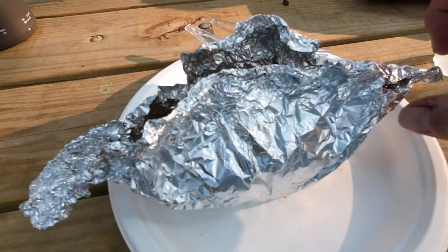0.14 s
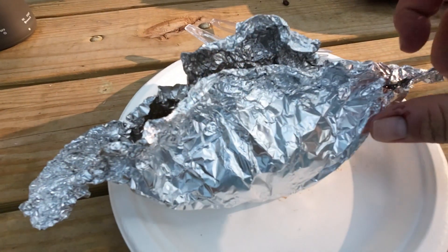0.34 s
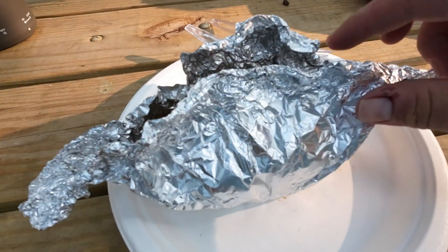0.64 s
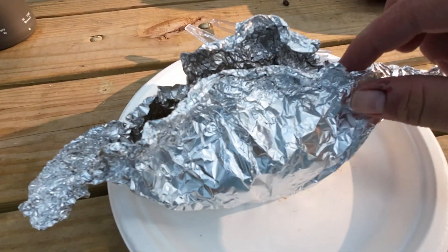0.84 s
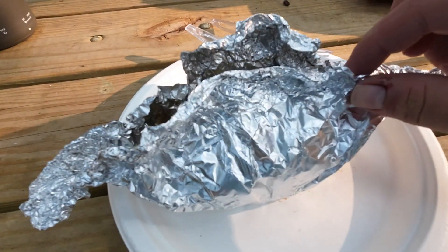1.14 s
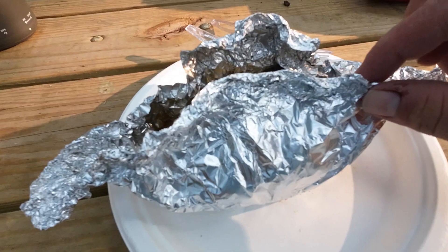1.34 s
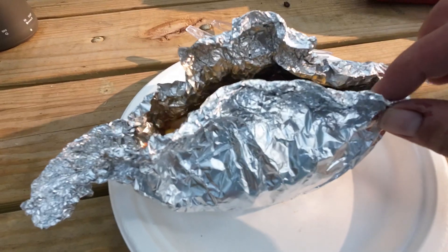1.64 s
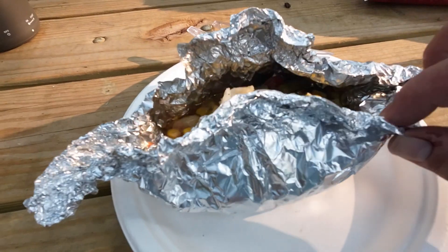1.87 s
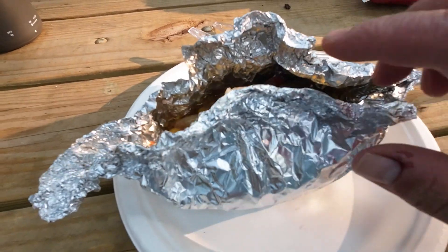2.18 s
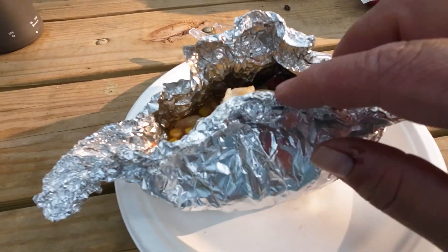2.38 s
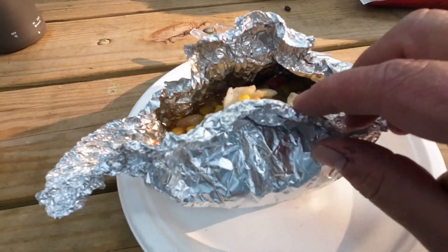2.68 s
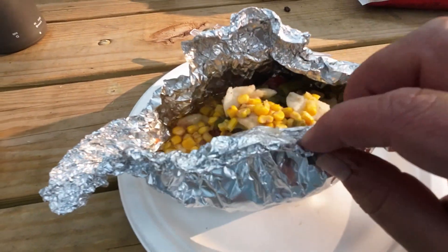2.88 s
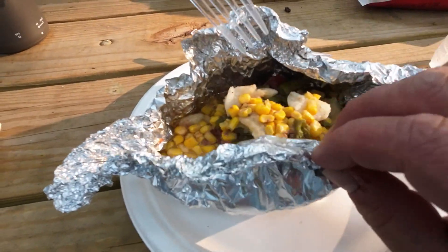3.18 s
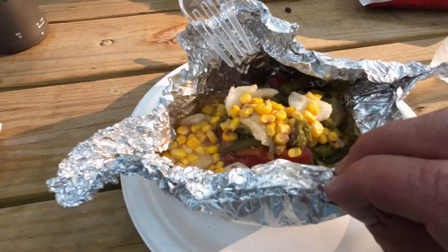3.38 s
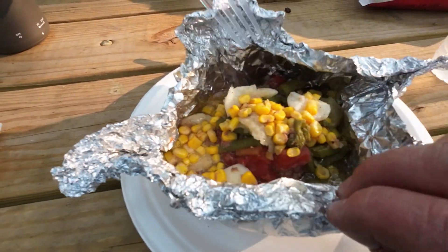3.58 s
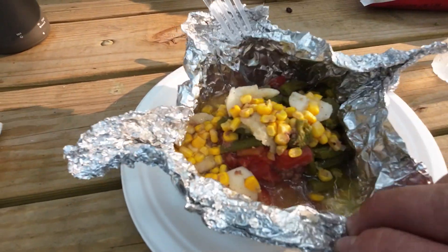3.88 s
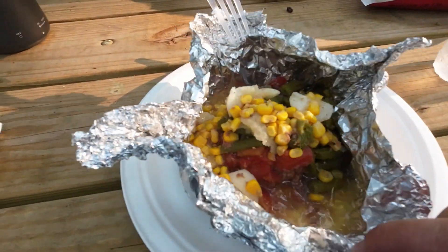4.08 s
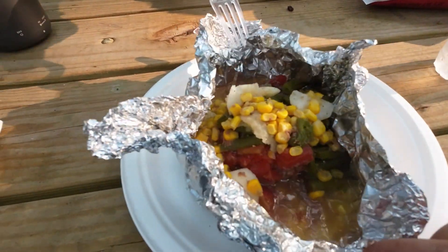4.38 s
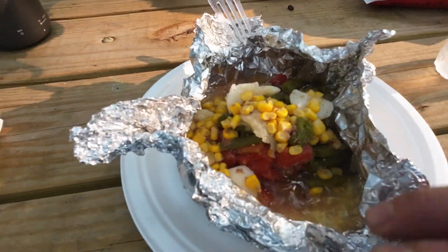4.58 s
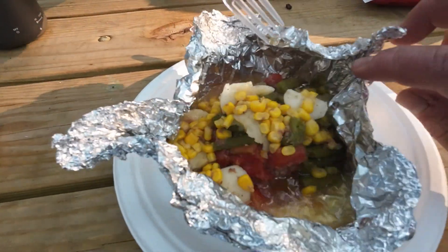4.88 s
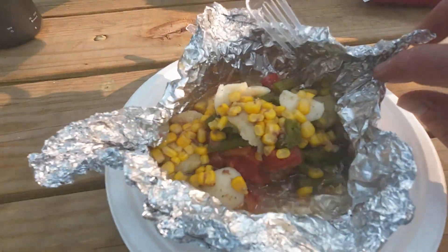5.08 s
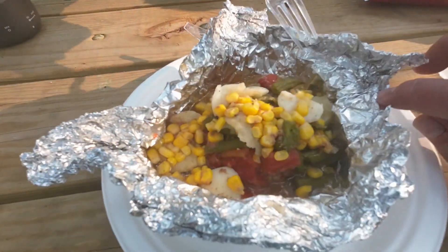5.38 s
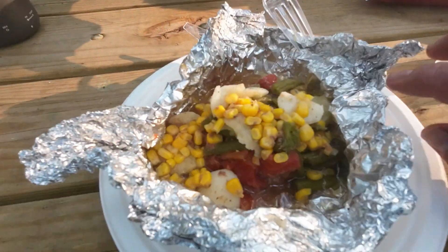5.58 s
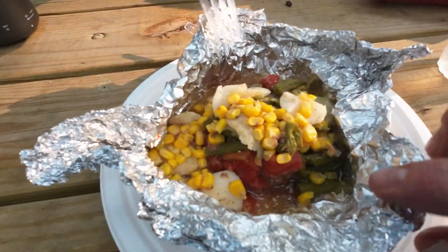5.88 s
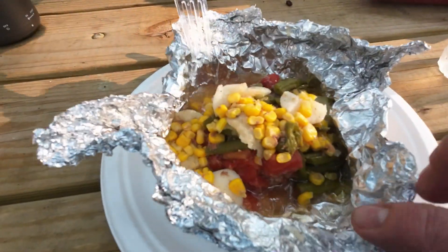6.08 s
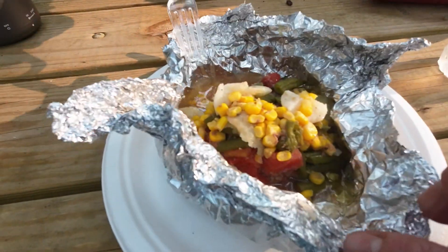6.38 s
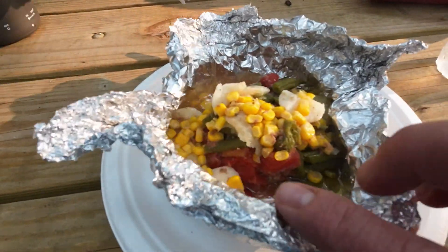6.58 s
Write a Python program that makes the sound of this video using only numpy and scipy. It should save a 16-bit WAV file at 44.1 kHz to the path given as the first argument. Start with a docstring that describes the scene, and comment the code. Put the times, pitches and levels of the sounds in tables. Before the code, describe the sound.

Over a steady low outdoor hum, aluminium foil is touched lightly, then pulled open in short, jerky bursts of crackling and sharp, tinny clicks. Fingertips rub the sheet, and the parcel of food now and then bumps softly on its plate. The foil is close and a little to the right, while a barely audible bird whistles far off to the left. Everything has a slightly hollow tone.

```python
"""Aluminium foil crinkles as fingers peel open a parcel of cooked vegetables on a plate.
Its creases buckle and ring in small metallic clinks, while skin rubs, wrinkles crackle and pushes thud.
The plate stands on a wooden table outdoors, where a low hum goes on and a bird whistles faintly.
Everything below the top octave arrives twice, a few milliseconds apart: a comb filter that sounds hollow."""
import sys
import numpy as np
from scipy import signal
from scipy.fft import rfft, irfft, next_fast_len
from scipy.io import wavfile
from scipy.ndimage import uniform_filter1d, map_coordinates

SR = 44100
rng = np.random.default_rng(int(sys.argv[2]) if len(sys.argv) > 2 else 0)


def master(y):
    """Save y as 16-bit WAV."""
    cut = np.clip(np.atleast_2d(y).T, -1, 1)
    pcm = np.round(cut * 32767)  # scale
    wavfile.write(sys.argv[1], SR, pcm.astype(np.int16))


N = 296793

# Levels are relative within each table.
# Spectra of open air, rubbing skin, coarse wrinkles and fine wrinkles: (frequency [Hz], level [dB])
AIR_SPECTRUM = [(12, -12), (32, 0.5), (56, 1), (92, -8), (145, -5.5), (275, -11), (460, -22.5),
                (820, -24.5), (1550, -34.5), (2450, -36.5), (4300, -46), (5650, -42.5), (7100, -55),
                (9100, -51.5), (11600, -54), (15200, -56.5)]
RUB_SPECTRUM = [(60, 0.5), (200, 1), (500, -8), (1000, -6), (1600, -7), (2600, -22.5), (6000, -62.5)]
CRINKLE_SPECTRUM = [(600, -22), (1500, 3), (2400, 11.5), (4000, 4.5), (6000, 5.5), (9000, -22.5),
                    (12000, 2.5)]
FIZZ_SPECTRUM = [(4000, -34), (8000, 7), (10500, 6), (16000, -1.5)]
# Stereo width of the air and of the foil: (frequency [Hz], side gain [dB])
AIR_SIDE_GAIN = [(35, -11), (70, -9), (130, -27.5), (500, -15), (2000, -7), (5000, -2.5), (10000, 2.5)]
FOIL_SIDE_GAIN = [(300, -22.5), (1500, -19.5), (2400, -17), (3700, -9.5), (4400, -11), (5300, -6.5),
                  (8000, -6), (11000, -2), (15000, -1.5)]
# Swells of the drone: (peak time [s], level [dB], rise constant [s], fall constant [s])
DRONE_SWELLS = [(2.4, -50.5, 0.054, .25), (4.88, -48, 0.14, 0.17), (5.15, -51, 0.068, 0.078),
                (5.56, -57, 0.064, 0.055)]
# High arching whistles: (time [s], level [dB])
BIRD_ARCHES = [(.15, -87), (1.87, -86)]
# Lower sagging notes: (time [s], duration [s], pitch [Hz], sag [Hz], level [dB])
BIRD_NOTES = [(.18, .27, 4035, 48, -79), (.54, .16, 2330, 370, -79), (1.935, 0.092, 4050, 80, -71),
              (5.72, .18, 4000, 10, -83)]
# The parcel bumps the plate: (time [s], level [dB])
PLATE_BUMPS = [(2.064, -38), (2.099, -42), (2.564, -40.5), (2.611, -35), (3.572, -44), (4.21, -40.5),
               (4.267, -42), (4.368, -41.5), (4.837, -35.5), (6.056, -37), (6.078, -46), (6.236, -35.5),
               (6.388, -45)]
# Crinkling of the held sheet between pulls: (time [s], level [dB])
GRIP_LEVELS = [(0, -100), (1.8, -94), (2.02, -68), (2.25, -95), (2.55, -66), (2.95, -73.5), (3.25, -75.5),
               (3.65, -74), (3.9, -67), (4.4, -72.5), (4.62, -68.5), (4.76, -88), (5.2, -71), (5.72, -75),
               (5.83, -95), (6.1, -70.5), (6.33, -84), (6.45, -60), (6.73, -70)]
# Pulls on the sheet: (time [s], duration [s], crinkle [dB], rub re crinkle [dB], fizz re crinkle [dB])
FINGER_PULLS = [(1.04, 0.13, -72.5, -5, -1.5), (2.015, 0.046, -58, -12, -7.5),
                (2.123, 0.012, -53.5, -3.5, -9), (2.364, 0.026, -66.5, -2, -9), (2.414, 0.031, -57, -7, -8),
                (2.553, 0.072, -57.5, -7.5, -6), (2.7, .11, -63, -4.5, -3.5),
                (2.832, 0.072, -60.5, -10, -10), (2.988, .14, -60.5, -11, -11),
                (3.378, 0.097, -65.5, 3.5, -5.5), (3.569, 0.029, -51.5, 0, -27),
                (3.719, 0.096, -64.5, 4.5, -12), (3.92, 0.048, -50.5, -10, -13),
                (4.053, 0.028, -58.5, 1.5, -13), (4.185, 0.11, -62.5, 1.5, -17),
                (4.455, 0.068, -63.5, -3, -12), (4.55, 0.083, -60, 2.5, -11),
                (4.834, 0.019, -65, -1.5, -10), (5.12, 0.657, -79.5, 0, 1.5), (5.26, 0.059, -62, 4, -21),
                (5.34, 0.11, -69, 3, -10), (5.52, .14, -68, -0.5, -4), (5.671, 0.032, -59, 5, -7.5),
                (5.886, 0.051, -51.5, -6.5, -6), (5.945, 0.14, -54, -2.5, -11), (6.119, .085, -54, -1, -11),
                (6.211, 0.021, -48.5, -4.5, -8.5), (6.448, 0.083, -57, 0, -11.5),
                (6.534, 0.067, -55, -10, -3)]
# Buckling creases: (time [s], level [dB], facet pitch [Hz], knock [dB], sizzle [dB], facet t60 [s])
CREASE_SNAPS = [(0.883, -47.5, 5190, -2, -18, .016), (.908, -57, 5000, -15, 1, 0.01),
                (0.936, -50, 4040, -15, -7, 0.021), (1.478, -61, 5000, -14, -5, .01),
                (1.583, -41.5, 2000, -32, -36, 0.0072), (1.713, -51, 4560, -15, -5, .014),
                (1.745, -63, 5000, -15, -4, .012), (1.936, -51.5, 4000, -20, -10, .012),
                (2.034, -38.5, 2110, -3.5, -8.5, 0.029), (2.101, -31.5, 2340, -22, -8.5, 0.0089),
                (2.343, -40.5, 4750, -8.5, -14, 0.018), (2.429, -34.5, 8700, -30, 5.5, .013),
                (2.46, -45.5, 3460, -25, 3, .01), (2.564, -22.5, 3460, -8.5, -19, .022),
                (2.569, -23, 3450, -10.5, -11, 0.024), (2.61, -25, 5620, -4.5, -20, 0.041),
                (2.613, -21.5, 5760, -12, -18, 0.011), (2.626, -32, 3530, -15, -7, .03),
                (2.702, -39, 1880, -28, -15, .016), (2.725, -24, 3960, -41, -14.5, 0.0082),
                (2.775, -25.5, 2200, -21.5, -16, 0.025), (2.864, -29.5, 3150, -12, -28, .025),
                (2.876, -37, 3200, -20, -26, 0.0074), (2.946, -27.5, 4050, -55, -42, 0.018),
                (3.025, -42.5, 2700, -18, -17, 0.011), (3.24, -40, 2135, -26.5, -17, 0.015),
                (3.338, -43, 3670, -2.5, -10, .015), (3.401, -42.5, 4980, -6, -6, 0.023),
                (3.485, -39, 1770, -12.5, -16, .022), (3.569, -27, 2340, -4, -11.5, .015),
                (3.579, -25, 5040, -3.5, -12, .019), (3.603, -26, 1680, -10, -10, .01),
                (3.856, -18.5, 2380, -28, -16, .015), (3.918, -12, 2410, -24, -19.5, .017),
                (4.126, -46, 2120, -30, 2.5, 0.011), (4.162, -36.5, 2580, -17, -12, 0.017),
                (4.193, -36, 3450, 3, -25, 0.017), (4.203, -33.5, 2530, -16, -5.5, .013),
                (4.212, -31.5, 2390, 3, -27, 0.011), (4.241, -31, 4900, -2, -23, 0.0067),
                (4.267, -21, 2305, -15, -20, 0.012), (4.283, -35.5, 4270, -5, -14, 0.0085),
                (4.367, -23, 2360, -10, -15.5, .015), (4.371, -25, 2386, -6, -20, .015),
                (4.448, -35, 2610, -27, -13, 0.023), (4.458, -35, 2660, -3.5, -12, .012),
                (4.561, -33, 3460, -23, -8, .013), (4.836, -40.5, 3365, 4.5, -12, .035),
                (4.934, -50, 3500, -20, -12, 0.0133), (4.985, -28, 5300, -2.5, -22, .016),
                (5.244, -41, 5000, 2.5, -24, 0.025), (5.269, -37, 2040, -2, -23, 0.0084),
                (5.314, -30.5, 3900, 1, -13, .021), (5.369, -34.5, 5200, -26, -15, 0.022),
                (5.463, -43.5, 2600, -22, -23, 0.013), (5.554, -43, 3100, -9, -13, 0.018),
                (5.579, -26, 3500, -26, -13, 0.016), (5.59, -18.5, 3306, -32.5, -16, .017),
                (5.625, -45, 3500, -23, -20, .012), (5.702, -30, 2410, -18, -19, 0.016),
                (5.917, -35, 2370, 0, -12, 0.015), (5.963, -36.5, 3070, -31, 0.5, 0.02),
                (5.991, -31, 2320, -3, -5, 0.022), (6.054, -32.5, 2090, 7, -12, .017),
                (6.079, -24.5, 3640, -27, -5.5, 0.0095), (6.082, -25.5, 3130, 2, -11.5, .013),
                (6.17, -35, 3400, -15, -12, .018), (6.235, -30.5, 2780, 0, -7, 0.0095),
                (6.336, -43.5, 6830, -17, -7, .013), (6.387, -28.5, 6130, -17, -15, .013),
                (6.389, -26, 5690, -3, -30, .008), (6.457, -37, 2210, -5, -20, 0.018),
                (6.578, -32, 4280, -48, -25, 0.032)]
# Responses of the early arrival, the late arrival and their sum: (frequency [Hz], gain [dB])
EARLY_RESPONSE = [(100, -1.5), (1500, 3.5), (5000, 1.5), (7700, .5), (9500, -14.5), (12000, -26.5)]
LATE_RESPONSE = [(100, 4), (1000, -3), (5000, -2.5), (9000, -2.5)]
OVERALL_RESPONSE = [(2000, -2), (2380, -0.5), (2700, -1), (7500, 3), (8900, -0.5), (10000, 5), (11700, 6.5),
                    (12900, -15), (14200, -1), (15400, 0), (15900, -24), (17500, -34.5)]

DOUBLING_S, TOP_HZ = .00378, 17500


def amp(db):
    """Amplitude ratio of a level in decibels."""
    return 10 ** (np.asarray(db) / 20)


def unit(x):
    """Normalisation to rms 1."""
    return x / np.sqrt(np.mean(x ** 2) + 1e-20)


def decay(t, t60):
    """Exponential damping: 60 dB in t60 seconds."""
    return np.exp(-np.log(1000) * t / t60)


def gain_at(points, hz):
    """Gain interpolated from (frequency [Hz], level [dB]) points on a logarithmic frequency axis."""
    knots_hz, db = np.transpose(points)
    return amp(np.interp(np.log(hz + 1), np.log(knots_hz + 1), db))


def wobble(rate):
    """Random modulation: a spline through `rate` Gaussian knots a second."""
    return map_coordinates(rng.standard_normal(int(N * rate / SR) + 4), [np.arange(N) * rate / SR])


def filtered(x, response):
    """Linear filtering: the spectrum is multiplied by a complex frequency response."""
    size = next_fast_len(N + SR // 4)
    return irfft(rfft(x, size) * response(np.fft.rfftfreq(size, 1 / SR)), size)[..., :N]


def coloured(x, spectrum):
    """Zero-phase filtering by (frequency [Hz], level [dB]) points."""
    return filtered(x, lambda hz: gain_at(spectrum, hz))


def narrowed(pair, side_gain):
    """Stereo width follows the ratio of side to mid, here set by frequency."""
    return np.array([pair[0], coloured(pair[1], side_gain)])


def narrow_noise(centre_hz, width_hz):
    """A resonance passes a narrow band of noise; mid and side, rms 1."""
    noise = rng.standard_normal((2, N))
    return unit(filtered(noise, lambda hz: 1 / (1 + ((hz - centre_hz) / width_hz) ** 2)))


def outdoors():
    """Superposed noise bands: the rumble of open air, a deep hum and a wide, swelling drone."""
    t = np.arange(N) / SR
    air = amp(-58.5 + .21 * wobble(4.5)) * unit(coloured(rng.standard_normal((2, N)), AIR_SPECTRUM))
    hum = amp(-65) * narrow_noise(centre_hz=34.1, width_hz=4)
    drone = narrow_noise(centre_hz=80.2, width_hz=7.1)
    drone += amp(-3.5) * narrow_noise(centre_hz=37, width_hz=28)
    strength = amp(-70.5 + 1.5 * t)  # slow growth beneath the swells
    for peak, db, rise, fall in DRONE_SWELLS:
        strength += amp(db) * np.exp(-np.maximum((peak - t) / rise, (t - peak) / fall))
    return narrowed(air + hum, AIR_SIDE_GAIN) + strength * drone * amp([[-2], [-4.5]])


def whistle(start, length, hz, db):
    """Random amplitude and frequency modulation make a pure tone flutter."""
    t = np.arange(N) / SR - start
    gate = np.clip(np.minimum(t, length - t) / .012, 0, 1)
    strength = gate * amp(db + 4.7 * wobble(70))
    pitch_hz = hz * (1 + .009 * wobble(300))
    return strength * np.sin(2 * np.pi * np.cumsum(pitch_hz) / SR)


def bird(arch_s=.42, foot_hz=8900, dip=.22, fade_db=17):
    """Frequency glides of a faint bird to the left: high arches, and lower notes that sag and fade."""
    song, t = np.zeros(N), np.arange(N) / SR
    for start, db in BIRD_ARCHES:
        turn = np.pi * np.clip((t - start) / arch_s, 0, 1)
        arch = np.sin(turn) * (1 + 2 * dip * np.cos(2 * turn)) / (1 - dip)  # a crown with two peaks
        song += whistle(start, arch_s, foot_hz + 2600 * arch, db - 7 * (1 - arch))
    for start, length, hz, sag_hz, db in BIRD_NOTES:
        progress = np.clip((t - start) / length, 0, 1)
        song += whistle(start, length, hz - sag_hz * progress, db - fade_db * progress)
    return np.array([song, .5 * song])


def table_echo(pair, t60, wet_db):
    """Scattering from the table and things nearby adds a short diffuse tail."""
    t = np.arange(SR // 6) / SR
    tail = rng.standard_normal((2, len(t))) * decay(t, t60) * (t > .004)
    tail /= np.linalg.norm(tail, axis=1, keepdims=True)
    return pair + amp(wet_db) * signal.fftconvolve(pair[:1], tail, axes=1)[:, :N]


def ring(t, hz, spread, t60, stagger, count):
    """Free vibration: damped modes around hz start in a quick cascade; mid and side, energy 1 each."""
    rank = (np.arange(count) + rng.random((2, count))) / count
    ratio = (rank + .045) / (1 - rank + 1e-6)  # a small body has no very low modes
    modes_hz = np.clip(hz * ratio ** np.clip(spread, .05, 1), 60, SR / 2)[..., None]
    age = np.maximum(t - stagger * t60 * rng.exponential(size=modes_hz.shape), 0)
    polarity = rng.choice([-1, 1], modes_hz.shape) * (modes_hz < TOP_HZ)
    ringing = np.sum(polarity * np.sin(2 * np.pi * modes_hz * age) * decay(age, t60), axis=1)
    return ringing / (np.linalg.norm(ringing, axis=1, keepdims=True) + 1e-9)


def plate_bumps():
    """Impact excitation: firm pushes pass through the food into the plate as dull, damped thuds."""
    out, t = np.zeros((2, N + SR)), np.arange(SR // 10) / SR
    for start, db in PLATE_BUMPS:
        thud = ring(t, hz=192.4, spread=.42, t60=.053, stagger=.079, count=14)
        out[:, int(start * SR):][:, :len(t)] += amp(db + 16.5) * thud
    return out[:, :N]


def first_touch(peak_s=1.11, width_s=.092):
    """Sliding friction: a fingertip strokes the foil lightly, with a smooth sheen."""
    stroke = np.exp(-((np.arange(N) / SR - peak_s) / width_s) ** 2)
    return stroke * amp(-73.5) * narrow_noise(centre_hz=5400, width_hz=1000)


def grains(spectrum, band_hz, rate, t60, scatter_db, hiss):
    """Shot noise: tiny wrinkles give way at random over the hiss of sliding skin; mid and side, rms 1."""
    t = np.arange(int(t60 * SR)) / SR
    when, pitch, chance, lean = rng.random((int(rate * N / SR), 4)).T[:, :, None]
    hz = np.interp(pitch, [0, 1], band_hz)
    size = amp(-scatter_db * np.log(chance + np.exp(-3)))  # few large, many small
    ticks = size * np.sin(2 * np.pi * hz * t) * decay(t, t60)
    samples = ((when * N).astype(int) + np.arange(len(t))).ravel()
    mid_side_gains = np.sign(lean - .5), np.cos(4 * np.pi * lean)
    pair = np.array([unit(np.bincount(samples, (ticks * g).ravel(), N)[:N]) for g in mid_side_gains])
    return unit(coloured(pair + hiss * rng.standard_normal((2, N)), spectrum))


def flexing(pair, depth_db):
    """Time-varying filtering: as the sheet changes shape, its resonances come and go."""
    spectra = signal.stft(pair, nperseg=512)[2]
    patches = uniform_filter1d(rng.standard_normal(spectra.shape[1:]), size=7, axis=0)
    patches = uniform_filter1d(patches, size=6, axis=1)
    return signal.istft(spectra * amp(depth_db * unit(patches)), nperseg=512)[1][:, :N]


def pull_envelope(t, length, attack_s=.0088, fade_db_per_s=554):
    """A pull takes hold quickly, lasts, and decays exponentially as the sheet settles."""
    return np.clip(t / attack_s, 0, 1) * amp(-fade_db_per_s * np.maximum(t - length, 0))


def handling():
    """Friction and fine buckling under the fingers; grip and jerky pulls are incoherent, so powers add."""
    t = np.arange(N) / SR
    grip_db = np.interp(t, *np.transpose(GRIP_LEVELS))
    power = amp([grip_db, grip_db - 4, grip_db - 7]) ** 2  # crinkle, rub, fizz
    for start, length, db, rub_db, fizz_db in FINGER_PULLS:
        span = slice(int(start * SR), int((start + length) * SR) + SR // 5)
        gains = amp([[db], [db + rub_db], [db + fizz_db]])
        power[:, span] += (gains * pull_envelope(t[span] - start, length)) ** 2
    crinkling, rubbing, fizzing = np.sqrt(power)
    jerks = amp(2.4 * wobble(110))
    rub = grains(RUB_SPECTRUM, band_hz=(350, 2135), rate=700, t60=.0056, scatter_db=5.5, hiss=1.45)
    crinkle = grains(CRINKLE_SPECTRUM, band_hz=(1220, 9300), rate=1400, t60=.003, scatter_db=5, hiss=.7)
    fizz = grains(FIZZ_SPECTRUM, band_hz=(7500, 16000), rate=1400, t60=.0014, scatter_db=7, hiss=.77)
    rustle = amp(1.27) * rubbing * rub + amp(-3) * crinkling * crinkle + amp(.5) * fizzing * fizz
    return jerks * flexing(rustle, depth_db=1.77)


def crease_snaps():
    """Snap-through buckling: a crease flips, its facet rings, the sheet knocks and wrinkles sizzle."""
    out = np.zeros((2, N + SR))
    for start, db, hz, knock_db, sizzle_db, t60 in CREASE_SNAPS:
        t = np.arange(min(int(1.4 * t60 * SR), SR // 30)) / SR
        spread = .35 + .0036 * knock_db  # the more of the sheet knocks, the wider the modes scatter
        main_mode = np.sin(2 * np.pi * hz * t) * decay(t, 1.15 * t60)
        facet = ring(t, hz, spread, t60, stagger=.03, count=40)
        facet += .55 * main_mode / np.linalg.norm(main_mode)
        knock = ring(t, hz=793, spread=.27, t60=1.39 * t60, stagger=.05, count=16)
        sizzle = ring(t, hz=12150, spread=.1707, t60=.65 * t60, stagger=.087, count=40)
        snap = facet + amp(knock_db + 1.5) * knock + amp(sizzle_db + 8) * sizzle
        out[:, int(start * SR):][:, :len(t)] += amp(db + 7.5) * snap
    return out[:, :N]


def scene():
    """Mid-side stereo: foil close by and a little to the right, open air behind; returns left, right."""
    snaps = table_echo(crease_snaps(), t60=.051, wet_db=-20.5)
    mid, side = snaps + plate_bumps() + handling() + first_touch()
    foil = narrowed([mid, side - .19 * mid], FOIL_SIDE_GAIN)
    far_bird = table_echo(bird(), t60=.13, wet_db=-3)
    mid, side = outdoors() + far_bird + foil
    return np.array([mid + side, mid - side])


def record(dry):
    """Comb filtering: a dull mono copy leads the stereo sound; the sum is coloured and band-limited."""
    early = coloured(dry.mean(axis=0), EARLY_RESPONSE)
    late = filtered(dry, lambda hz: np.exp(-2j * np.pi * hz * DOUBLING_S) * gain_at(LATE_RESPONSE, hz))
    return filtered(early + late, lambda hz: gain_at(OVERALL_RESPONSE, hz) * (hz < TOP_HZ))


dry = scene()
out = record(dry)
master(out)
```